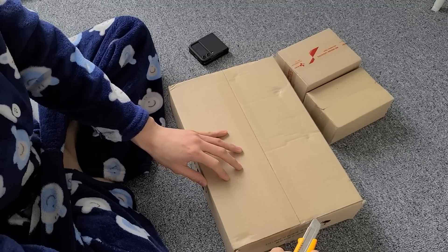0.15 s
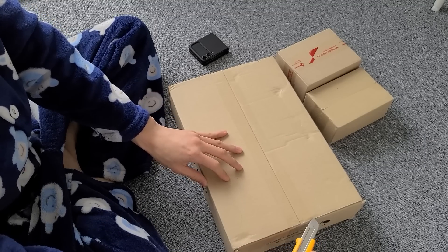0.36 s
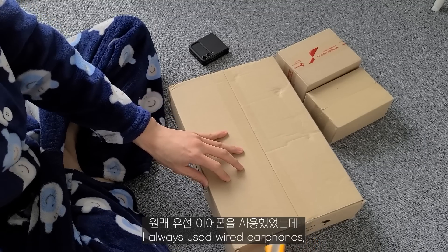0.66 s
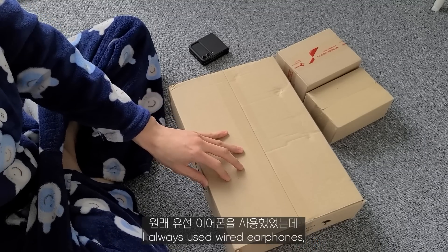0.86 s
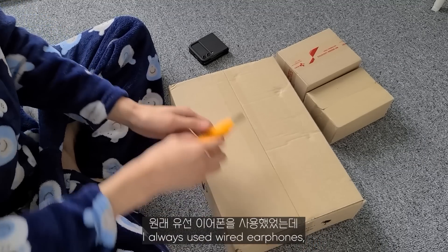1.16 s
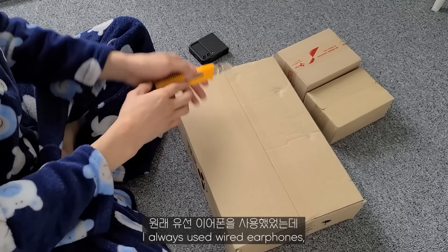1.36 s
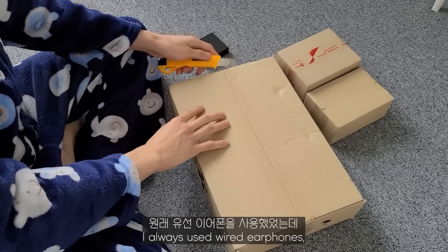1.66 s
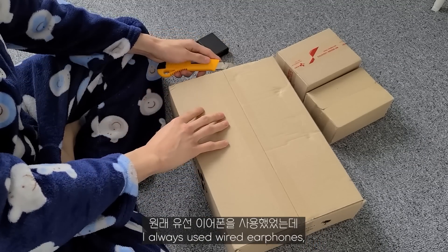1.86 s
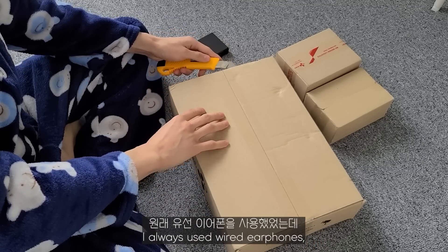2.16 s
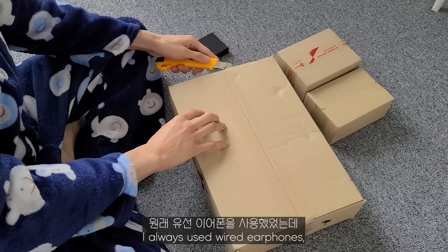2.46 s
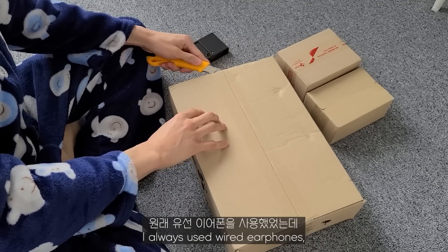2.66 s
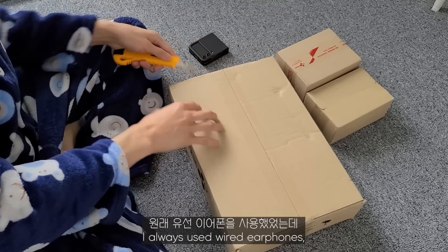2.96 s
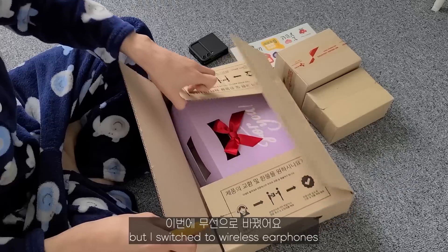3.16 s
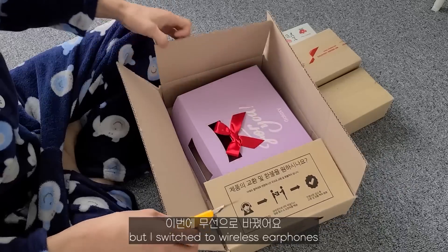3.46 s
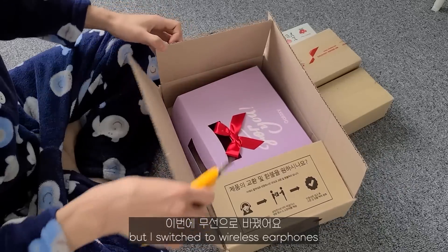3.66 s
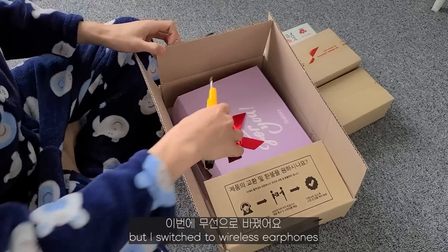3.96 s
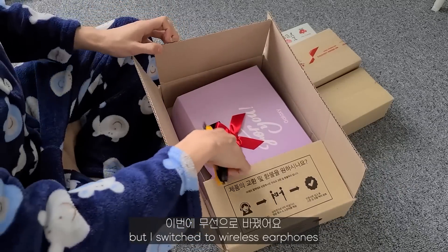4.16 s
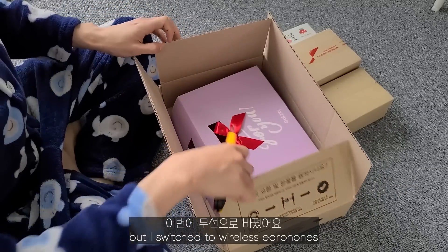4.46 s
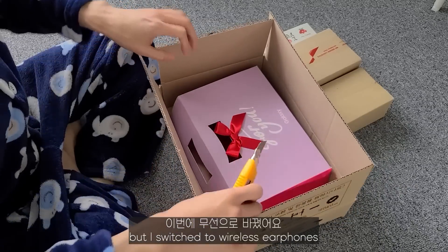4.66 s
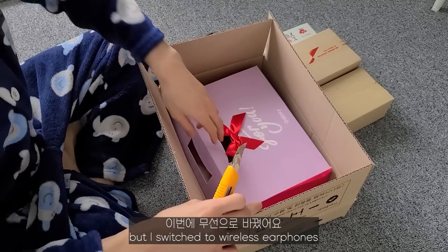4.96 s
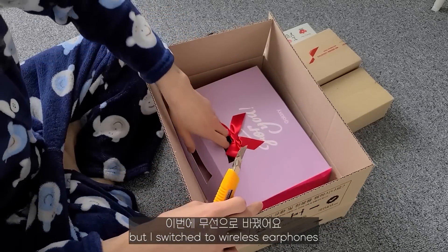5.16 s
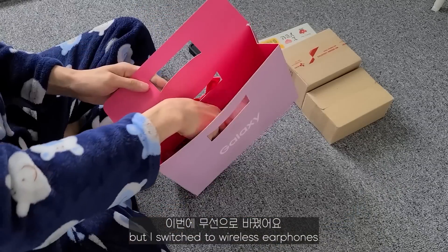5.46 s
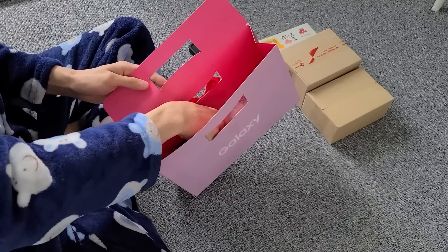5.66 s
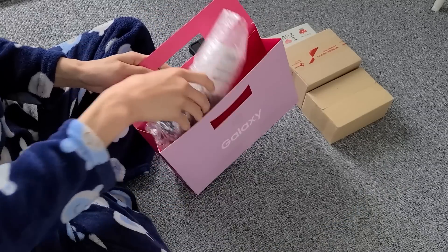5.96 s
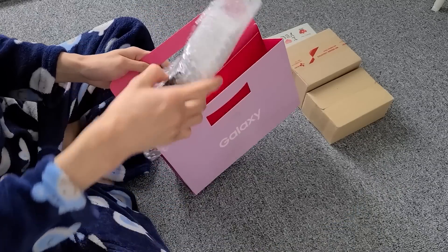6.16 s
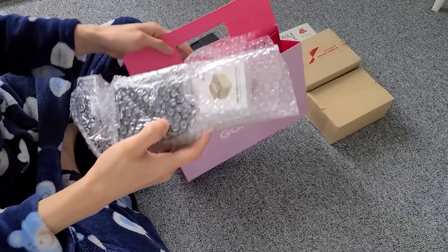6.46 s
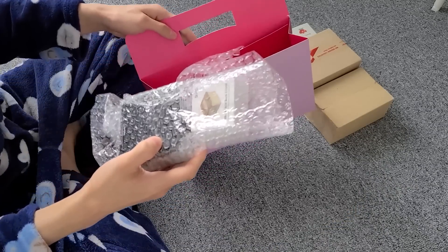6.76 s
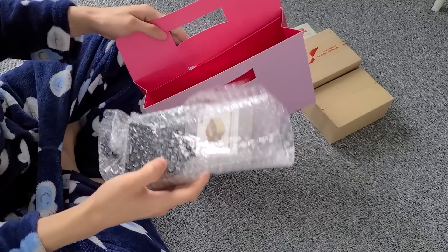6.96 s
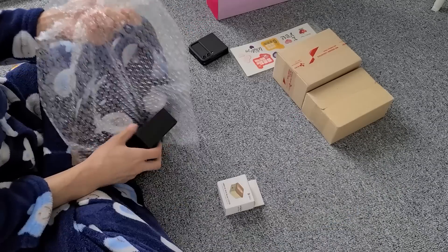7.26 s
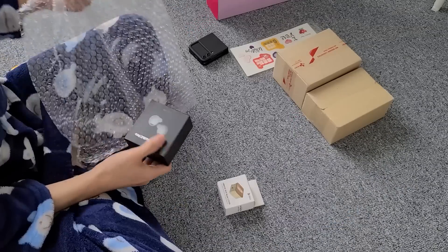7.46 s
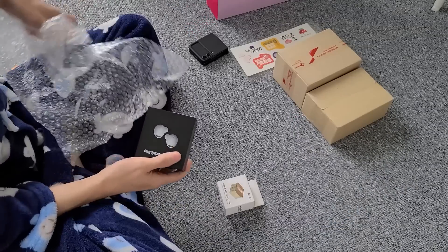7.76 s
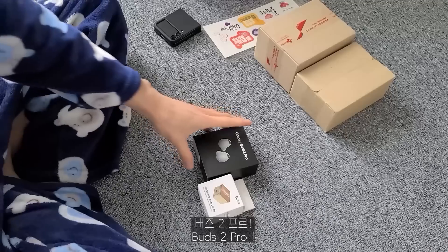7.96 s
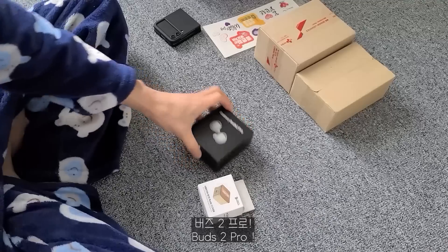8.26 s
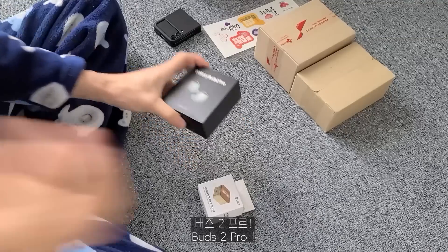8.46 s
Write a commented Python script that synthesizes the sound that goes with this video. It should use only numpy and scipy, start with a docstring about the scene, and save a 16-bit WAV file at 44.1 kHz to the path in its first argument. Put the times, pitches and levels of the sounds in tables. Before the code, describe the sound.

Close parcel opening: cutter clicks, sharp tape snaps, knocking hollow carton, dragging flaps, rustling gift box and crackling bubble wrap, ending nearly quiet.

```python
"""Opening parcels on a carpet

Hands open parcels in a small room, close to a stereo microphone, in five moments joined by hard splices.
Rubbing is noise and tiny slips in the colour of tape, flaps, gift box or wrap; it also drums the hollow boxes.
Rips, creaks, snaps, ticks and cutter clicks are short bursts; knocks ring the modes of the cardboard.
Soft puffs of moved air, a low wavering hum and a faint hiss run unbroken beneath.
"""
import sys
import numpy as np
from scipy import signal
from scipy.fft import rfft, irfft, next_fast_len
from scipy.io import wavfile
from scipy.ndimage import uniform_filter1d, map_coordinates

SR = 44100
rng = np.random.default_rng(int(sys.argv[2]) if len(sys.argv) > 2 else 0)


def digitize_waveform(pressure):
    """Quantize a signal to 16-bit integers and store it at the path in sys.argv[1].

    Rows of a 2-D input are taken as channels; values are limited to [-1, 1].
    """
    field = np.atleast_2d(pressure).T
    bounded = np.clip(field, -1, 1)
    quanta = np.round(bounded * 32767).astype(np.int16)
    wavfile.write(sys.argv[1], SR, quanta)


def boost_factor(decibels):
    """Convert a level in decibels to a linear amplitude factor."""
    exponent = np.asarray(decibels, float) / 20
    return 10 ** exponent


N = 379701  # length in samples

# Colours of rubbed materials. Each row: frequency in Hz, relative level in dB per Hz.
FLAPS = [(350, -67.5), (600, -9), (858, -12.5), (1240, -13), (1730, -8.5), (2120, -14.5), (2610, -9.5),
         (4340, -13), (6030, -7), (7520, -7), (9890, -14), (15100, -9.5), (16000, -21.5)]
GIFT_BOX = [(350, -71), (600, 0.5), (679, -5.5), (790, -3.5), (1900, -2), (2090, -3.5), (2400, -3),
            (2950, -0.5), (8900, -6), (9800, -11.5), (13800, -8.5), (16000, -16)]
SLEEVE = [(350, -31), (600, -9), (846, -11.5), (1070, -11), (1160, -9.5), (3340, -13), (15100, -38.5),
          (16000, -30.5)]
# Ringing modes of the hollow carton. Each row: frequency in Hz, width in Hz, strength in dB.
BOX_MODES = [(109, 60, -20), (181, 40, -7.5), (219, 49, -4.5), (289.2, 90, -4), (376.3, 41.8, 4),
             (460.4, 56.4, 4), (728, 415, -8.5), (900, 41, -8.5), (1510, 570, -20.5)]
# How alike left and right are for wide sources. Each row: frequency in Hz, likeness (1 is the same).
WIDE_ALIKE = [(200, 1), (700, 0.72), (2000, 0.75), (8000, 0.05)]


def unit(x):
    """Scale to rms 1."""
    return x / np.sqrt(np.mean(x ** 2) + 1e-20)


def along(points, hz):
    """Read (Hz, value) points on a log frequency axis."""
    f, v = np.transpose(points)
    return np.interp(np.log(hz + 1), np.log(f + 1), v)


def curves(rows, t):
    """Read each column after the time column at times t."""
    s, *cols = np.transpose(rows)
    return [np.interp(t, s, c) for c in cols]


def swells(rows, t):
    """Add up bell-shaped gains from rows of centre in seconds, dB and length in seconds."""
    return sum(boost_factor(db) * np.exp(-.5 * ((t - s) / length) ** 2) for s, db, length in rows)


def wobble(rate, size):
    """A smooth random curve with rate knots a second."""
    knots = rng.standard_normal(int(size * rate / SR) + 4)
    return map_coordinates(knots, [np.arange(size) * rate / SR])


def filtered(x, response):
    """Multiply the spectrum of x by a complex response of frequency."""
    m = next_fast_len(x.shape[-1] + SR // 4)
    spectrum = rfft(x, m) * response(np.fft.rfftfreq(m, 1 / SR))
    return irfft(spectrum, m)[..., :x.shape[-1]]


def add_at(out, s, sound):
    """Mix a sound into out, starting at s seconds."""
    start = round(s * SR)
    out[..., start:start + sound.shape[-1]] += sound


def resonance(hz, centre, width):
    """One resonance of peak gain 1 that rings only after it is struck."""
    return 1j * hz * width / (centre ** 2 - hz ** 2 + 1j * hz * width)


def sides(db):
    """Gains of left and right for a level difference, left over right."""
    return boost_factor(np.multiply.outer([.5, -.5], db))


def spread(pair, alike, lag_ms=0):
    """Make left and right from two unrelated signals, one shared and one opposed; left lags by lag_ms."""
    turn = lambda hz: np.arccos(np.clip(along(alike, hz), -1, 1)) / 2
    mid, side = filtered(pair, lambda hz: np.array([np.cos(turn(hz)), np.sin(turn(hz))]))
    ramp = lambda hz: np.exp(1j * np.pi * hz * lag_ms / 1000 * np.array([[-1], [1]]))
    return filtered(np.array([mid + side, mid - side]), ramp)


def grains(size, rate, scatter_db):
    """Friction: two trains of tiny slips of uneven strength, in clumps, on a bed of noise."""
    shape = (2, size)
    strength = boost_factor(scatter_db * np.minimum(rng.exponential(size=shape), 3))
    slips = (rng.random(shape) < rate / SR) * rng.standard_normal(shape) * strength
    clumps = boost_factor(1.6 * wobble(60, size) + 0.42 * wobble(18, size))
    return (unit(slips) + 0.98 * rng.standard_normal(shape)) * clumps


def box(hz, gains_db=np.zeros(len(BOX_MODES))):
    """The panels and the air inside the cardboard: a sum of resonances with alternating signs."""
    return sum((-1) ** k * boost_factor(db + gains_db[k]) * resonance(hz, centre, width)
               for k, (centre, width, db) in enumerate(BOX_MODES))


def piece(hz, count, breadth, top_hz):
    """The colour of a small piece: a hump at its pitch, a few chance modes, and a dull top."""
    modes = hz * 2 ** rng.normal(0, 0.64, count)

    def response(f):
        chance = sum(resonance(f, m, 0.019 * m) for m in modes)
        return (resonance(f, hz, breadth * hz) + 0.42 * chance) / (1 + 1j * f / top_hz) ** 2
    return response


def air():
    """Steady room noise, and a wavering hum of the building inside a band of rumble."""
    # Colour of the room noise. Each row: frequency in Hz, relative level in dB per Hz.
    noise_colour = [(56, -9.5), (95, -6.5), (251, -10), (292, -9.5), (370, -8.5), (621, -15.5), (998, -13),
                    (1350, -16), (2520, -18.5), (4420, -20), (14200, -30.5), (16500, -20.5)]
    # Each row: frequency in Hz, likeness of left and right.
    noise_alike = [(60, 0.99), (240, -0.094), (950, -0.12), (3770, -0.073), (15000, -0.32)]
    # Level of the hum. Each row: time in seconds, level in dB.
    hum_level = [(0.0, -68), (0.62, -66), (4.17, -66.5), (4.89, -59), (5.37, -73), (6.21, -66.5),
                 (6.6, -70.5), (7.36, -63.5), (7.87, -61.5), (8.61, -71.5)]
    noise = filtered(rng.standard_normal((2, N)), lambda hz: boost_factor(along(noise_colour, hz)))
    pitch_hz = 58 + 2.8 * wobble(2.3, N)
    hum = np.sin(2 * np.pi * np.cumsum(pitch_hz) / SR) * boost_factor(0.5 * wobble(15.0, N))
    rumble = filtered(rng.standard_normal((2, N)), lambda hz: resonance(hz, 72.6, 30) ** 2)
    low = unit(hum) * sides([-1.1]) + boost_factor(-5.0) * spread(unit(rumble), noise_alike)
    low_gain = boost_factor(curves(hum_level, np.arange(N) / SR)[0])
    return boost_factor(-65.5) * spread(unit(noise), noise_alike) + low_gain * low


def puffs():
    """Air pushed out by a swinging flap or a lifted load: low soft thuds of noise."""
    # Each row: centre in seconds, rms level in dB, length in seconds.
    puff_rows = [(2.668, -55, 0.1), (3.385, -45, 0.046), (4.913, -61, 0.027), (5.476, -56.5, 0.02),
                 (5.663, -56.5, 0.035), (6.018, -49.5, 0.05)]
    thud = filtered(rng.standard_normal(N), lambda hz: resonance(hz, 71.0, 61) ** 2)
    return swells(puff_rows, np.arange(N) / SR) * unit(thud)


def cutter():
    """The cutter's slider clicks in its track: a noisy rattle, and the blade and handle ring."""
    # Each row: start in seconds, level in dB before the cuts made below.
    click_rows = [(0.8665, -24), (0.9282, -27.5), (1.1662, -31.5)]
    # Ringing of blade and handle. Each row: frequency in Hz, level in dB, time to fall 60 dB in seconds.
    ring_modes = [(1406, -3, 0.069), (2100, -7, 0.089), (2720, -1, 0.054), (3005, 3, 0.047),
                  (4420, -1.5, 0.054), (5330, -1, 0.029), (6500, -7.5, 0.049)]
    low_hz, top_hz, rattle_t60 = 1800, 8200, 0.17
    out, t = np.zeros((2, N + SR)), np.arange(SR // 4) / SR
    band = lambda hz: 1 / (1 + (low_hz / (hz + 1)) ** 2) / np.sqrt(1 + (hz / top_hz) ** 12)
    for s, db in click_rows:
        # every click rings at slightly new strengths
        ring = sum(boost_factor(level + rng.normal(0, 0.47) - 60 * t / t60) * np.sin(2 * np.pi * hz * t)
                   for hz, level, t60 in ring_modes)
        noise = filtered(rng.standard_normal((2, len(t))), band)
        rattle = boost_factor(db - 13.5 - 60 * t / rattle_t60) * spread(unit(noise), WIDE_ALIKE)
        add_at(out, s, boost_factor(db - 12) * ring + rattle)
    return out[:, :N]


def ticks():
    """Creasing film and card: one clean click across a band, and a faint rustle after it."""
    # Each row: start in seconds, peak in dB, lowest Hz, highest Hz, left over right in dB.
    tick_rows = [(6.1445, -26, 4000, 14000, 1), (6.7176, -42.5, 5000, 13900, 18),
                 (6.9397, -23.5, 400, 16160, 3), (7.1065, -32, 1240, 11000, 0.5),
                 (7.2245, -29.5, 3000, 10150, -1.5), (7.2785, -28.5, 5000, 14100, -2),
                 (7.588, -50.5, 10000, 15000, -4), (7.6995, -25.5, 2480, 8000, -7),
                 (7.8612, -29, 2320, 6000, 7), (8.0245, -42, 393, 1800, -5)]
    tail_db, tail_t60 = -28.5, .12  # rustle before the band filter, and seconds to fall 60 dB
    out, t = np.zeros((2, N + SR)), np.arange(SR // 4) / SR
    for s, db, low, high, pan_db in tick_rows:
        burst = (t == 0) + boost_factor(tail_db - 60 * t / tail_t60) * rng.standard_normal((2, len(t)))
        band = lambda hz: (1j * hz / low / (1 + 1j * hz / low) / (1 + 1j * hz / high)) ** 2
        tone = filtered(burst, band)
        add_at(out, s, boost_factor(db) * tone / abs(tone).max() * sides([pan_db]))
    return out[:, :N]


def creaks():
    """Thin card and film creak: coarse slips ring one broad resonance of the bent sheet."""
    # Each row: start in seconds, level in dB, run in seconds, then time to fall 60 dB in seconds, centre in Hz.
    creak_rows = [(1.059, -63, 0.01, 0.45, 900), (1.12, -62.5, 0.042, 0.072, 1270),
                  (1.17, -60, 0.064, 0.14, 2240), (1.246, -62, 0.013, 0.21, 900),
                  (2.621, -42.5, 0.016, 0.23, 3120), (3.62, -63, 0.02, .08, 900),
                  (4.4, -43.5, 0.19, .1, 888), (4.5, -51, 0.13, 0.11, 1670),
                  (5.18, -54.5, 0.041, 0.12, 700), (5.293, -54, 0.014, 0.046, 1610),
                  (5.3, -51, 0.023, .08, 730), (5.376, -54, 0.04, 0.088, 1250),
                  (5.465, -46, 0.013, 0.13, 840), (5.577, -49.5, .015, 0.066, 810),
                  (5.615, -54.5, 0.043, .1, 990), (6.402, -59, 0.056, 0.075, 1780),
                  (7.106, -58, .1, .06, 1600), (7.858, -51, 0.029, 0.098, 3030),
                  (8.022, -65, 0.0087, 0.15, 900), (8.205, -68, .03, 0.089, 500),
                  (8.44, -67.5, 0.085, .08, 554)]
    out, t = np.zeros((2, N + SR)), np.arange(SR // 2) / SR
    for s, db, run, t60, hz in creak_rows:
        band = lambda f: resonance(f, hz, 0.28 * hz) ** 2
        sound = spread(filtered(grains(len(t), 900, 2.2), band), WIDE_ALIKE)
        shape = np.minimum(t / 0.0038, 1) * boost_factor(db - 60 * np.maximum(t - run, 0) / t60)
        add_at(out, s, unit(shape * sound) * np.sqrt(np.mean(shape ** 2)))
    return out[:, :N]


def tears():
    """Blade through tape, ripping tape, dragging card: grainy noise starts at once, runs, fades; the box joins."""
    # Each row: start in seconds, level in dB, run in seconds, then time to fall 60 dB in seconds, centre in Hz.
    tear_rows = [(.112, -45, 0.0062, 0.16, 3000), (.562, -38.5, 0.0075, 0.42, 2980),
                 (0.707, -35, 0.029, 0.049, 3430), (0.736, -53.5, 0.094, 0.83, 2760),
                 (1.802, -33, 0.016, 0.24, 2720), (2.194, -41.5, 0.055, 0.12, 2100),
                 (2.614, -46, 0.0099, 0.12, 3050), (2.823, -38.5, 0.013, 0.29, 1880),
                 (2.927, -49, 0.08, 0.13, 3020), (3.377, -29, 0.006, 0.033, 7250),
                 (3.391, -40, 0.0055, 0.044, 7000), (4.24, -55, 0.0057, 0.05, 2000)]
    out, t = np.zeros((2, N + SR)), np.arange(SR // 2) / SR
    for s, db, run, t60, hz in tear_rows:
        rip = grains(len(t), 3000, 0.72)
        sheet = unit(filtered(rip, piece(hz, count=6, breadth=1.0, top_hz=60000)))
        sound = sheet + .5 * unit(filtered(rip, box))  # the tape pulls on the box
        shape = np.minimum(t / 0.0018, 1) * boost_factor(db - 60 * np.maximum(t - run, 0) / t60)
        add_at(out, s, shape * spread(sound, WIDE_ALIKE, lag_ms=-0.086) * sides([1]))
    return out[:, :N]


def snaps():
    """Tape, blade, card and film snap: a sharp crack and a short rattle, in the colour of the piece."""
    # Each row: start in seconds, peak in dB, centre in Hz, left over right in dB, rattle over the crack in dB.
    snap_rows = [(0.0314, -37.5, 1510, 1, -8), (0.3706, -44.5, 1250, 13, -17), (0.563, -24, 1510, -2, 2),
                 (0.5715, -16, 1630, 1, -11), (0.6748, -29, 1525, -0.5, -5),
                 (0.7142, -22.5, 1600, -6, -26.5), (0.734, -21, 7000, -1, -12),
                 (1.062, -55.5, 900, -2, -18), (1.248, -37.5, 11700, 7, -6), (1.79, -42.5, 6500, 3, -4.5),
                 (1.8201, -25, 1510, -1, -6), (2.529, -46.5, 1750, 3.5, -4), (2.6303, -29, 3150, 12.5, -3),
                 (2.738, -39.5, 9000, -0.5, -4.5), (2.763, -30, 3600, -1, -20), (2.873, -28, 1700, 0, -17),
                 (2.9245, -11.5, 2100, 2, -21.5), (2.938, -22, 2930, 6, -9), (3.184, -35.5, 7200, 1, 1),
                 (4.323, -46, 6500, -1.5, 0), (4.6852, -26.5, 1270, 8, -7.5), (5.4668, -36, 1360, -6, -10),
                 (5.9685, -26, 2100, 4.5, -7), (5.9955, -27.5, 1510, -6.5, 0),
                 (6.2015, -30, 4000, -8, -13.5), (7.0841, -30.5, 2150, -3.5, -15),
                 (7.867, -44, 3200, -0.5, -12)]
    out, t = np.zeros((2, N + SR)), np.arange(SR // 4) / SR
    for s, db, hz, pan_db, rattle_db in snap_rows:
        fade = boost_factor(-60 * t / 0.0012) + boost_factor(rattle_db - 60 * t / 0.12)
        burst = rng.standard_normal((2, len(t))) * fade
        burst = burst + [[3], [0]] * (t == 0)  # a single click in one of the two signals
        colour = piece(hz, count=4, breadth=1.5, top_hz=5.0 * hz)
        tone = spread(filtered(burst, colour), WIDE_ALIKE, lag_ms=-0.056)
        add_at(out, s, boost_factor(db) * tone / abs(tone).max() * sides([pan_db]))
    return out[:, :N]


def knocks():
    """A soft push and a little rattle ring the box; the hard edge of a blow reaches its higher modes."""
    # Each row: start in seconds, peak of the soft part in dB, hard edge over it in dB (before 3 dB is taken off).
    knock_rows = [(0.117, -33.5, -3.5), (0.569, -20, -5.5), (0.673, -27, -24), (0.708, -19, -13.5),
                  (0.733, -10, -12.5), (0.745, -16, -24), (0.763, -20, -21), (0.778, -28, -20),
                  (0.789, -27.5, -16), (0.807, -25.5, -3), (0.826, -23.5, -24), (1.059, -43.5, -3.5),
                  (1.248, -50.5, 10.5), (1.714, -40.5, -13), (1.802, -31.5, 0), (1.858, -27, -33),
                  (2.5, -45.5, -2), (2.632, -21.5, -3.5), (2.659, -32, -15), (2.78, -32.5, -15),
                  (2.822, -25.5, 0.5), (2.862, -35, -14), (2.924, -28.5, 8.5), (2.991, -35, -18),
                  (3.067, -39.5, -20), (3.258, -29.5, -20), (3.694, -38.5, -1.5), (4.241, -31.5, -3.5),
                  (4.63, -34, 6), (4.683, -50.5, 25), (5.466, -38, 7), (5.577, -42.5, -1),
                  (5.666, -40.5, 0), (5.971, -39, 6), (7.067, -42.5, -5), (7.257, -49, 4.5),
                  (7.576, -48, -26.5), (8.023, -46.5, 10.5), (8.213, -50.5, -20)]
    out, t = np.zeros(N + SR), np.arange(SR // 4) / SR
    u = t / 0.00059  # time counted in rise times of the push
    for s, db, hard_db in knock_rows:
        rattle = rng.standard_normal((2, len(t))) * boost_factor(-60 * t / [[.03], [.02]])
        # each blow lands elsewhere: mode strengths (dB) and pitch vary
        gains_db = 2 * rng.standard_normal(len(BOX_MODES))
        size = 1 + .03 * rng.standard_normal()
        body = lambda hz: box(size * hz, gains_db)
        push = u * np.exp(1 - u) + 0.97 * rattle[0]
        soft = filtered(push, lambda hz: body(hz) / (1 + 1j * hz / 800) ** 2)
        edge = filtered(rattle[1], lambda hz: body(hz) * resonance(hz, 1200, 804) ** 2)
        add_at(out, s, boost_factor(db) * (soft / abs(soft).max() + boost_factor(hard_db - 3) * edge / abs(edge).max()))
    return out[:N]


def pops(hiss_db):
    """Sparse dry ticks of creasing plastic film, which follow the hiss level of that instant."""
    rate, over_hiss_db, centre_hz = 45, 17, 6000  # ticks a second; dB before the filter
    size = len(hiss_db)
    draw = rng.random(size) < rate / SR
    strength = boost_factor(hiss_db + over_hiss_db + 4.5 * rng.standard_normal((2, size)))
    impulses = draw * strength * rng.choice([-1, 1], size)
    return filtered(impulses, lambda hz: resonance(hz, centre_hz, 1.2 * centre_hz))


def bending(x, t, ring_db, patchy_db):
    """A panel and an edge resonance that move as the card bends, among many passing small ones."""
    # Pitch of the bending card. Each row: time in seconds, frequency in Hz.
    panel_path = [(0, 1320), (3.0, 1270), (3.3, 1080), (3.7, 735), (4.4, 900), (4.6, 883), (4.8, 715),
                  (5.3, 780), (6.0, 1064), (6.45, 1747), (7.15, 1583), (7.5, 1230), (8.61, 1090)]
    # Bright band of a dragging flap edge. Each row: time in seconds, frequency in Hz, strength in dB.
    edge_path = [(3.2, 3060, -2), (3.3, 3200, 4), (3.35, 3180, 3), (3.375, 7630, -1), (3.52, 7930, 1),
                 (3.58, 6220, 5.5), (3.66, 5960, -18.5), (4.38, 6000, -14), (4.47, 6560, -2.5),
                 (4.56, 7000, 5), (4.64, 7670, 4.5), (4.75, 6860, 7), (5, 6000, -16.5)]
    hz, s, z = signal.stft(x, SR, nperseg=512)
    hz = hz[:, None]
    field = uniform_filter1d(rng.standard_normal(z.shape[1:]), size=3, axis=0)
    field = uniform_filter1d(field, size=10, axis=1)
    patches = boost_factor(patchy_db * unit(field) / (1 + hz / 9000))
    panel = curves(panel_path, t[0] + s)[0]
    edge, edge_db = curves(edge_path, t[0] + s)
    ring = 1 + boost_factor(ring_db) * abs(resonance(hz, panel, .35 * panel)) ** 2
    ring = ring * (1 + boost_factor(edge_db) * abs(resonance(hz, edge, 0.58 * edge)) ** 2)
    return signal.istft(z * ring * patches, SR, nperseg=512)[1][:, :len(t)]


def rubbing(rows, shares, material, grain, t):
    """Slips take the material's colour and shake the box; one effort drives scrape, hiss and drumming."""
    # A hand leans on a box and it rumbles. Each row: centre in seconds, rms level in dB, length in seconds.
    lean_rows = [(.785, -36.5, 0.017), (1.89, -58, 0.12), (2.65, -43, 0.02), (3.06, -60, 0.073),
                 (3.278, -48.5, 0.033), (4.45, -49, 0.015), (4.7, -41.5, 0.019), (4.915, -55, 0.012),
                 (5.35, -64, 0.094), (6.023, -43.5, 0.032)]
    firm_db = -50  # scrape level at which the shares hold
    film_out_s, film_db_per_s = 5.56, 9  # the wrap slides out of the gift box: hiss gains on the scrape
    far_flap_s, far_flap_hiss_db = 4.2, -1.5  # the second flap drags with less hiss
    rate, scatter_db, lag_ms, pan_db, ring_db, patchy_db, box_size = grain
    hiss_over_db, hiss_grows, drum_over_db, drum_grows = shares

    scrape_db, = curves(rows, t)
    extra_db = film_db_per_s * np.maximum(t - film_out_s, 0) * (material is GIFT_BOX)
    extra_db = extra_db + far_flap_hiss_db * (t > far_flap_s) * (material is FLAPS)
    hiss_db = firm_db + hiss_over_db + hiss_grows * (scrape_db - firm_db) + extra_db
    drum_gain = boost_factor(firm_db + drum_over_db + drum_grows * (scrape_db - firm_db)) + swells(lean_rows, t)

    slips = spread(grains(len(t), rate, scatter_db), WIDE_ALIKE, lag_ms)
    slips = bending(slips, t, ring_db, patchy_db)
    upper = lambda hz: 1 / (1 + (4000 / (hz + 1)) ** 6)  # share of the hiss, above about 4 kHz
    scrape = unit(filtered(slips, lambda hz: boost_factor(along(material, hz)) * (1 - upper(hz))))
    hiss = unit(filtered(slips, lambda hz: boost_factor(along(material, hz)) * upper(hz)))
    shaking = spread(grains(len(t), 900, 5.0), WIDE_ALIKE)
    drum = unit(filtered(shaking, lambda hz: box(box_size * hz)))
    film = (t > film_out_s) & (material is not SLEEVE)
    surface = boost_factor(scrape_db) * scrape + boost_factor(hiss_db) * hiss + film * pops(hiss_db)
    return surface * sides([pan_db]) + drum_gain * drum


def room(x):
    """Echoes as fading noise, drawn afresh every quarter second; each frequency dies at its own speed."""
    # Each row: frequency in Hz, time to fall 60 dB in seconds.
    decay = [(100, 0.27), (500, 0.29), (3000, 0.16), (12000, 0.12)]
    # Each row: frequency in Hz, likeness of left and right in the tail.
    tail_alike = [(100, 0.91), (400, 0.84), (900, 0.069), (3000, 0.04)]
    out, step = np.zeros((2, x.shape[1] + SR)), SR // 4
    for i in range(0, x.shape[1], step):
        hz, t, z = signal.stft(rng.standard_normal((2, SR // 2)), SR, nperseg=256)
        fade = boost_factor(-60 * t / along(decay, hz)[:, None])
        tail = signal.istft(z * fade, SR, nperseg=256)[1]
        tail = tail / np.linalg.norm(tail[0])
        wet = signal.fftconvolve(x[:, i:i + step].mean(0)[None], tail, axes=1)
        out[:, i + 200:][:, :wet.shape[1]] += wet  # the tail starts 200 samples late
    return spread(out[:, :x.shape[1]], tail_alike)


def scene():
    """Each moment joins mid-stroke with its room already sounding; the next splice cuts its tail off."""
    # Starts of the five moments and the end, in seconds.
    splices = [0, 3.043, 5.375, 7.062, 7.948, 8.7]
    # Effort of the rubbing, one list a moment. Each row: time in seconds, scrape level in dB.
    effort = [
        [(0.0, -79), (0.2, -78), (0.41, -67.5), (0.64, -71), (0.74, -39.5), (0.81, -45), (0.95, -59.5),
         (1.02, -78), (1.12, -63), (1.53, -89.5), (1.75, -85.5), (2.06, -106), (2.3, -55.5), (2.42, -79.5),
         (2.65, -66), (2.78, -49.5), (2.85, -48), (3.04, -52.5)],
        [(3.05, -65.5), (3.225, -55.5), (3.3, -45.5), (3.376, -36), (3.476, -38), (3.62, -41.5), (3.67, -53.5),
         (3.84, -62), (3.89, -79), (3.994, -65), (4.19, -89), (4.256, -56), (4.378, -76), (4.398, -45.5),
         (4.445, -38.5), (4.595, -39.5), (4.703, -47), (4.77, -52), (4.81, -56), (4.949, -64.5), (5.167, -67.5),
         (5.193, -59.5), (5.37, -66)],
        [(5.38, -52.5), (5.426, -57), (5.46, -51.5), (5.662, -55.5), (5.7, -68), (5.745, -55.5), (5.895, -48.5),
         (6.023, -43.5), (6.121, -51.5), (6.243, -52.5), (6.341, -64), (6.481, -51), (6.519, -71), (6.767, -85),
         (6.9, -90)],
        [(7.068, -53), (7.204, -56), (7.398, -59), (7.418, -53.5), (7.528, -62.5), (7.712, -50), (7.786, -54),
         (7.943, -52)],
        [(7.955, -82.5), (8.01, -65), (8.04, -60.5), (8.1, -64.5), (8.163, -64), (8.301, -69), (8.61, -75)],
    ]
    # Each row, one a moment: hiss over scrape in dB, hiss growth in dB per dB,
    # drumming over scrape in dB, drumming growth in dB per dB.
    effort_shares = [(-5.5, 1.05, -11, 0.38), (-1.5, 1.5, -4, 0.64), (-4, 0.76, -12.5, 0.9),
                     (1, 1, -12.5, 1.9), (-9, 0.67, -16.5, 0.26)]
    # Each row, one a moment: grains a second, strength scatter in dB, left lag in ms, left over right in dB,
    # panel ring in dB, patchiness in dB, size of the box against the carton.
    grain_rows = [(6000, 3.5, -0.083, 3, -1, 4, 0.99), (4000, 1, 0.066, 1.5, 5.5, 4.5, 1.045),
                  (6570, 0, -0.093, 1.5, -9, 2, 0.96), (5000, 3, -0.21, 2.5, -9.5, 1.5, 1.22),
                  (7050, 3, 0.035, 5.5, -25, 0.5, 1.16)]
    # Colours of tape and bubble wrap. Each row: frequency in Hz, relative level in dB per Hz.
    tape = [(350, -14.5), (600, 4), (1080, -5.5), (1530, -2), (2340, -12), (3390, -5.5), (8050, 0),
            (9600, -19), (13000, -4.5), (16000, -13.5)]
    wrap = [(350, -15), (600, -12.5), (1330, -10), (2010, -7.5), (2800, -5), (3730, -6.5), (7520, 2),
            (10500, -2), (15100, -0.5), (16000, -12.5)]
    materials = [tape, FLAPS, GIFT_BOX, wrap, SLEEVE]

    hits = tears() + creaks() + snaps() + ticks() + cutter() + knocks()
    lead = SR // 5  # rubbing ahead of each splice, heard only through its room tail
    edges = np.minimum(np.round(np.multiply(splices, SR)).astype(int), N)
    parts = []
    for a, b, rows, shares, material, grain in zip(edges, edges[1:], effort, effort_shares, materials, grain_rows):
        near = np.pad(hits[:, a:b], [(0, 0), (lead, 0)])
        near = near + rubbing(rows, shares, material, grain, np.arange(a - lead, b) / SR)
        parts.append((near + boost_factor(-5.5) * room(near))[:, lead:])
    return np.hstack(parts) + puffs() + air()


def top_cut(x):
    """Nothing passes above the cut-off."""
    return signal.sosfilt(signal.butter(12, 16970, fs=SR, output="sos"), x)


def record(dry):
    """The microphone keeps nothing above its band limit of 16 kHz."""
    mix = filtered(dry, lambda hz: hz < 16000)
    return top_cut(mix)


dry = scene()
out = record(dry)
digitize_waveform(out)
```